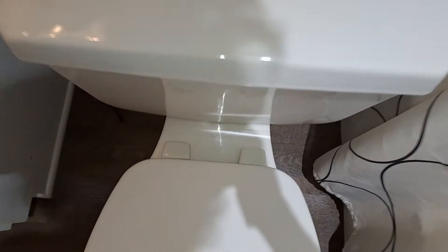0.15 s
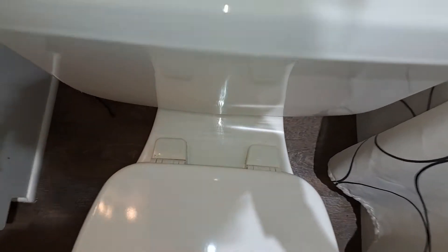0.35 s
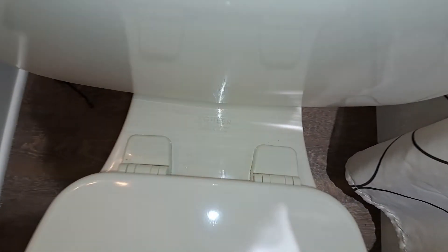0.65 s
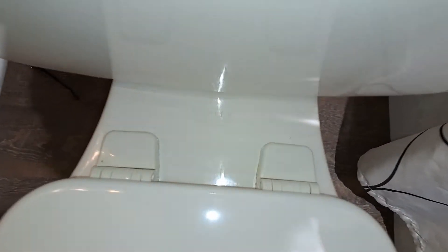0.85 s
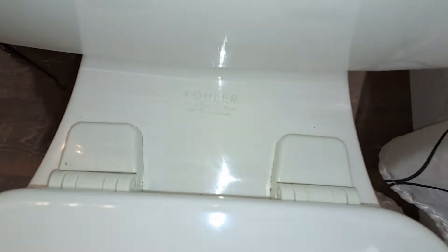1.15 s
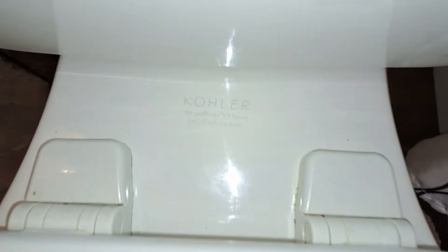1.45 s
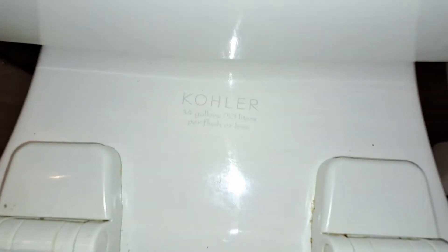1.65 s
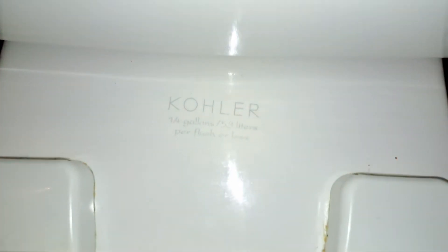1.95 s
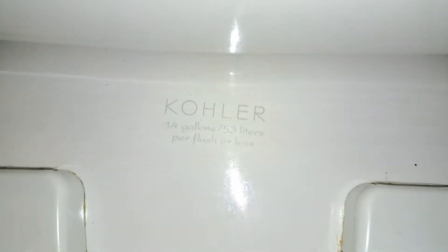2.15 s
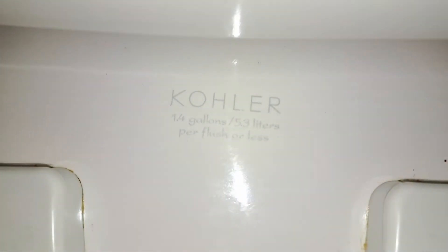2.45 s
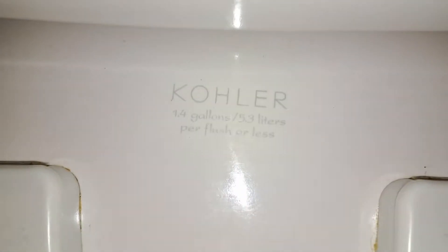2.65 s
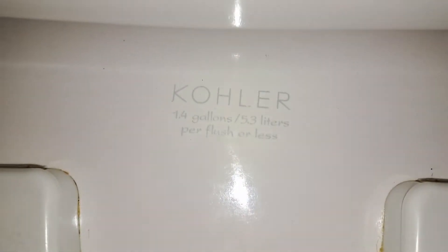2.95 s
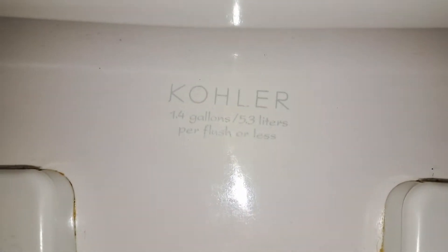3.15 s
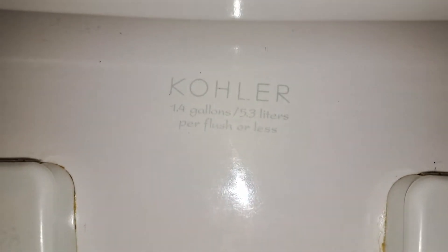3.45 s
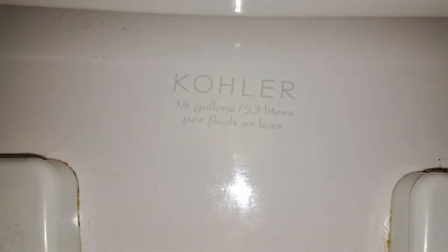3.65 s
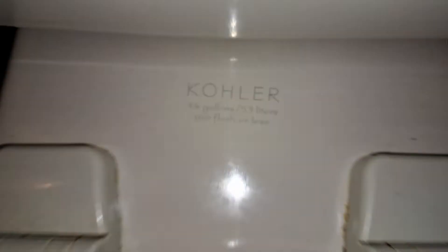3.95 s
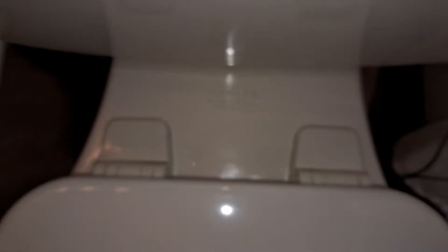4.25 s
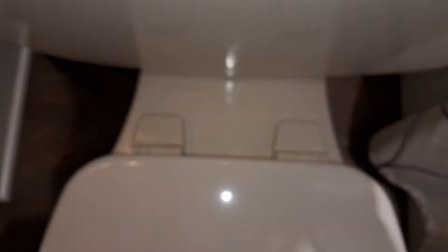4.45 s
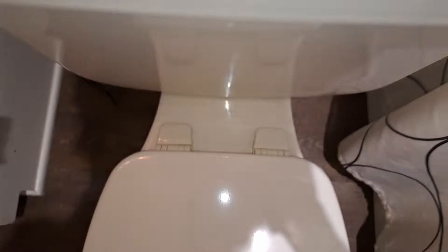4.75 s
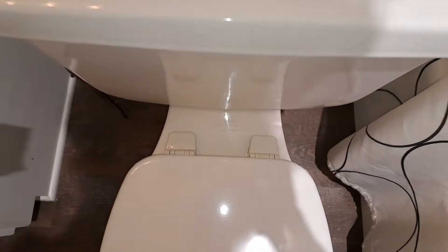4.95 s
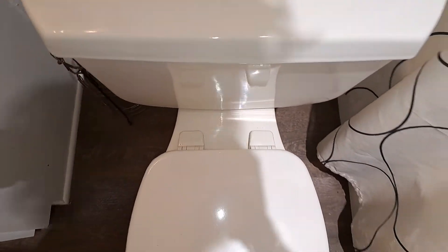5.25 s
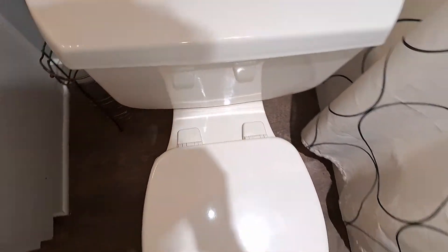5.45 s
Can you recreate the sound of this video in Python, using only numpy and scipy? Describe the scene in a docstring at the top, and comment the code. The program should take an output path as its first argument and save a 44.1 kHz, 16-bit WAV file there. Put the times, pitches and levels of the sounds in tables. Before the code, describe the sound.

Quiet bathroom air with an unsteady low hum is broken early by a sharp, hollow plastic lid slap, by far the loudest event, fading within about half a second. Afterwards something rubs faintly in uneven strokes, a small cluster of taps sounds, more rubbing follows, and a low bump with a rough scrape ends the action. The microphones are close and handheld in character.

```python
"""A low, wavering rumble and soft hiss fill a small tiled bathroom; a plastic toilet lid then clacks onto its seat.
Later something rubs softly in long strokes, taps, and ends in a dull, scuffed knock.
The lid, taps and knocks are decaying modes; the crack, rubbing, scuff and air are coloured noise; the rumble is
wavering sines plus resonated noise. Two unlike microphone ports, close together, hear the treble differently."""
import sys
import numpy as np
from scipy import signal
from scipy.fft import rfft, irfft, next_fast_len
from scipy.io import wavfile

SR = 44100
rng = np.random.default_rng(int(sys.argv[2]) if len(sys.argv) > 2 else 0)


def transcribe(u):
    """Save the signal u as a 16-bit wav file named by the first command-line argument.

    u: samples, shape (n,) or (channels, n), limited to [-1, 1]; the rate is SR.
    q: integer samples, one column per channel.
    """
    v = np.clip(np.atleast_2d(u).T, -1, 1)
    q = np.round(v * 32767).astype(np.int16)
    wavfile.write(sys.argv[1], SR, q)


N = 247842

# room air: [t/s, level/dB, top treble/dB]
AIR_LEVELS = [(0, -54.5, -5.5), (.9, -55, 0), (1.02, -57.5, -9), (1.15, -56.5, -1), (1.3, -53.5, -10),
              (1.8, -55.5, -10.5), (3.3, -55, -9), (5.05, -50.5, -14), (5.25, -54, -5.5), (5.62, -53, -7.5)]
# air spectrum, relative: [f/Hz, density/dB per Hz]
AIR_COLOUR = [(20, -47.5), (48, -17), (95, -5), (160, -14), (400, -41), (600, -28.5), (830, -34),
              (1150, -25), (1500, -28.5), (2000, -24.5), (3200, -28), (4300, -43), (5800, -49.5),
              (7500, -40.5), (9500, -45.5), (12300, -30.5), (15700, -51)]
# faint narrow whines: [f/Hz, width/Hz, level/dB]
WHINES = [(1349, 29, -66), (1753, 73, -71), (1940, 27, -83.5)]

# standing waves: [t/s, lowest/dB, second/dB, higher/dB]
RUMBLE_LEVELS = [(0, -57, -49, -57), (.3, -59.5, -61, -59), (1.3, -52.5, -53.5, -53.5),
                 (1.85, -60.5, -58, -54), (2.03, -60, -48.5, -55.5), (2.2, -58, -59.5, -54.5),
                 (2.4, -56.5, -54, -53), (3.1, -54.5, -52, -51), (3.85, -50, -48.5, -50.5),
                 (3.95, -49.5, -54.5, -50), (4.7, -56, -56.5, -55.5), (5.15, -56, -59, -56),
                 (5.62, -58, -52, -57.5)]
# higher standing waves: [f/Hz, first-stage width/Hz, relative level/dB]
STANDING_WAVES = [(189.8, 35, -1.5), (220.6, 25.6, -1), (252.2, 14.5, 3), (273.1, 15, -1), (319.4, 28, 2.5),
                  (349.3, 37, -8.5), (444, 47, -4), (483, 74, -4.5)]
# swells added to the lowest standing wave: [t/s, peak/dB]
SWELLS = [(.04, -50), (.4, -45), (.7, -47), (.9, -54), (1.1, -54.5), (1.5, -43.5), (1.61, -51), (1.73, -50),
          (2.11, -48), (2.55, -48), (2.74, -49), (2.92, -46.5), (3.09, -45), (3.3, -48), (3.67, -45.5),
          (3.86, -38), (4.12, -46), (4.24, -52), (4.4, -50), (4.6, -49), (4.72, -56), (4.94, -46),
          (5.3, -55)]
LOWEST_HZ, SECOND_HZ = 69.4, 122.5
SUB_HUM_HZ, SUB_HUM_DB = 28.1, -58.5
SWELL_SIGMA_S = 0.029
FADE_DB, SECOND_FADE_DB, FADE_RATE_HZ = 2, 3.0, 5.4   # random fading of the two hums
WAKE_DB, WAKE_RISE_S, WAKE_T60_S = -22, 0.039, .45   # the clack wakes the higher standing waves

# rubbing strokes: [t/s, level/dB, top treble/dB]
RUB_STROKES = [(1.84, -75, 8.5), (2.02, -56, -6), (2.15, -58, -3.5), (2.36, -47, -0.5), (2.57, -43.5, 0),
               (2.71, -52, 6), (2.78, -46.5, 6.5), (3.21, -47.5, -1), (3.32, -52.5, -8), (3.41, -54.5, 0.5),
               (3.56, -45.5, 2), (3.95, -46.5, -1), (3.99, -44, 3), (4.31, -45.5, -1.5), (4.64, -45.5, 1.5),
               (4.785, -55.5, 1), (5.0, -66, 3)]
# friction spectrum, relative: [f/Hz, density/dB per Hz]
RUB_COLOUR = [(150, -54), (270, -13), (500, -11), (900, -12.5), (1400, -9), (2100, -6), (2800, -4),
              (3600, -9), (4600, -15.5), (5700, -21.5), (7500, -17.5), (9000, -26), (12000, -14.5),
              (15700, -29.5)]
LEAN_DB, LEAN_RATE_HZ, LEAN_SPLIT_HZ = 1.5, 2.5, 2630   # rubbing leans brighter or duller at random

# scuffed knock: [t/s, thump/dB, scuff/dB, boom/dB]
SCUFF_LEVELS = [(4.794, -60, -61, -56), (4.806, -33, -41, -37), (4.83, -35, -38.5, -50),
                (4.858, -41, -37, -31), (4.968, -46, -43.5, -43), (4.995, -64, -49, -51),
                (5.06, -63, -54, -45.5), (5.15, -62, -67, -63)]
# thump spectrum, relative: [f/Hz, density/dB per Hz]
THUMP_COLOUR = [(15, -10), (30, 10), (55, -5.5), (90, 6), (200, -42.5)]
# scuff spectrum, relative: [f/Hz, density/dB per Hz]
SCUFF_COLOUR = [(180, -31), (300, -9), (354, 3), (404, -8.5), (446, -8.5), (697, -13.5), (770, -14.5),
                (1400, -10.5), (1540, -15), (2710, -10), (5600, -33.5), (12200, -35), (15600, -51)]
BOOM_HZ, BOOM_WIDTH_HZ = 122.8, 26.4

# small knocks within the scuff: [t/s, level/dB, tilt/dB per octave]
KNOCKS = [(4.807, -31.5, -4), (4.847, -41.5, -2), (4.866, -41, 1.5), (4.915, -40, 2), (4.93, -47, 5.5)]
# modes rung by each knock: [f/Hz, level/dB, t60/s]
KNOCK_MODES = [(181.5, 2, 0.26), (255, -12, .1), (316, -4, 0.11), (353, -3.5, 0.13), (441.2, -6, 0.31),
               (800, -19, .05)]
KNOCK_SPREAD_DB, KNOCK_RISE_S = 4, 0.0023

# dull taps and bumps: [t/s, level/dB, f/Hz]
TAPS = [(3.726, -38.5, 248), (3.770, -28.5, 352), (3.788, -35, 383), (3.797, -36.5, 460), (3.986, -41, 325),
        (3.771, -36, 2500), (3.851, -33, 2600), (4.825, -25, 49.7), (5.014, -37, 55)]
TAP_CYCLES = 13   # swings to -60 dB

# soft returns of a lid ring: [t/s, level/dB]
RETURNS = [(1.603, -37), (1.695, -44)]
RETURN_HZ, RETURN_RISE_S, RETURN_T60_S = 580, 0.00605, 0.2

# clack treble, relative: [f/Hz, density/dB per Hz]
CRACK_COLOUR = [(500, -38), (800, -19.5), (1100, -13.5), (1500, -16), (2100, -13.5), (2800, -21.5),
                (3800, -29), (5500, -50), (7500, -53.5), (10000, -59.5), (12500, -53.5), (15500, -73)]
# clack tail in the room: [f/Hz, t60/s]
CRACK_T60 = [(600, 0.51), (1500, 0.34), (3000, 0.31), (4500, 0.3), (7000, 0.34), (15000, 0.19)]
CRACK_DB, SNAP_T60_S, SNAP_DB, CRACK_RISE_S = -19, 0.026, 17, 0.0027

# contacts of the lid: [t/s, strength/dB]
LID_CONTACTS = [(1.42266, -5.3), (1.42842, 0), (1.42946, -.7), (1.4403, -14.9)]
# lid, seat and room air ringing together: [f/Hz, level before LID_DB/dB, t60/s, sense of swing]
LID_MODES = [(117.7, -28.6, .37, 1), (123.7, -19.4, .39, -1), (143.1, -28.6, .145, 1),
             (187.8, -14.1, .274, -1), (192.3, -11.6, .27, 1), (199, -12.8, .19, -1),
             (225.1, -24.7, .347, -1), (240, -13.9, .185, 1), (250.6, -23.6, .418, -1),
             (274.9, -35, .3, -1), (315.4, -21.9, .278, -1), (329.2, -24.6, .397, 1), (345.2, -17.4, .3, 1),
             (408.4, -12.1, .245, 1), (452.2, -16.8, .103, 1), (471.9, -13.5, .187, 1),
             (546.5, -10.2, .205, 1), (550.4, -22.5, .49, 1), (562.2, -20.1, .297, -1),
             (577.7, -27.2, .41, 1), (604, -14.7, .292, -1), (662.9, -19.5, .05, -1),
             (787.9, -22.7, .064, -1)]
# porcelain modes: [f/Hz]
BOWL_HZ = [281, 326.5, 405, 445.5, 503, 556, 673, 799, 834, 922, 1034, 1109, 1180, 1268, 1434, 1507, 1758,
           1850, 1943, 2040, 2395]
# the same porcelain modes: [level/dB, t60/s]
BOWL_RINGING = [(-50, 0.34), (-42, 0.49), (-43, 0.27), (-23.5, 0.32), (-26, 0.31), (-37, 0.55), (-35, 0.43),
                (-37.5, 0.34), (-37.5, 0.44), (-26.5, 0.38), (-22, 0.18), (-44.5, 0.32), (-34, 0.25),
                (-28, 0.27), (-28.5, .12), (-34.5, 0.19), (-33.5, 0.18), (-28.5, .2), (-40, 0.22),
                (-44, 0.18), (-32.5, 0.14)]
# paths from the lid to the ports: [f/Hz, left lead/rad, left minus right/dB]
LID_PATH = [(97.3, 0.18, 0), (300, 0.13, 0), (550, 0.61, 4), (900, 1.8, -3.5), (1290, 2, 6),
            (2000, 2.7, -5.5), (3020, 19, -6.5)]
LID_DB, CONTACT_HZ = 1.2, 4000   # rubber bumpers round the clicks off

# likeness of diffuse sound at the ports: [f/Hz, left-right correlation]
LIKENESS = [(40, 0.48), (150, 0.78), (300, 0.89), (640, 0.57), (1000, -0.18), (1400, -0.4), (2400, 0.038),
            (15000, -0.0067)]
# port colour: [f/Hz, left minus right/dB]
PORT_DIFFERENCE = [(60, -3.5), (130, 1), (400, -2), (750, -0.5), (1200, -7.5), (1800, -8), (2700, -16.5),
                   (3600, -11.5), (4500, -4.5), (5800, 8), (7300, -3), (9000, 1.5), (10500, -2.5),
                   (12300, -7), (15000, 1.5)]
RIPPLE_DB, RIPPLE_HZ = 2.0, 29.76   # the bare room favours some pitches: ripple depth and spacing
CUTOFF_HZ = 15740


def from_db(db):
    """Decibels to gain."""
    return 10 ** (np.asarray(db) / 20)


def rms_one(x):
    """Scale to unit rms."""
    return x / np.sqrt(np.mean(x ** 2) + 1e-20)


def in_time(rows):
    """Table columns at every sample, plus a gate open while the table lasts."""
    s, *columns = np.transpose(rows)
    t = np.arange(N) / SR
    gate = np.clip(np.minimum(t - s[0], s[-1] - t) / 0.0048, 0, 1)
    return [np.interp(t, s, c) for c in columns] + [gate]


def at_hz(points, hz):
    """Read a spectrum table on a log-frequency axis."""
    table_hz, value = np.transpose(points)
    return np.interp(np.log(hz), np.log(table_hz), value)


def bins(length):
    """Transform frequencies in Hz, at least 1."""
    return np.maximum(np.arange(length // 2 + 1) * SR / length, 1)


def diffuse(spectrum, length=N):
    """Coloured noise from all round: alike at both ports in the bass, unrelated in the top treble."""
    size = next_fast_len(length)
    hz = bins(size)
    mid, side = rfft(rng.standard_normal((2, size)))
    alike = np.clip(at_hz(LIKENESS, hz), -1, 1)
    pair = np.sqrt(1 + alike) * mid + np.sqrt(1 - alike) * side * [[1], [-1]]
    ripple = np.interp(hz / RIPPLE_HZ, np.arange(2000), rng.standard_normal(2000))
    gain = from_db(at_hz(spectrum, hz) + RIPPLE_DB * ripple)
    return rms_one(irfft(pair * gain, size)[:, :length])


def resonance(x, hz, width_hz):
    """Two-pole resonance, peak gain about 1."""
    r = np.exp(-np.pi * width_hz / SR)
    zeros = np.array([1, 0, -1]) * (1 - r * r) / 2
    poles = [1, -2 * r * np.cos(2 * np.pi * hz / SR), r * r]
    return signal.lfilter(zeros, poles, x)


def brighten(x, top_db, split_hz):
    """Give the treble above the split its own level curve."""
    high_pass = signal.butter(2, split_hz, "high", fs=SR, output="sos")
    top = signal.sosfiltfilt(high_pass, x)
    return x + top * (from_db(top_db) - 1)


def drift(rate_hz):
    """Low-passed random wander of unit rms."""
    r = np.exp(-2 * np.pi * rate_hz / SR)
    wander = signal.lfilter([1], [1, -2 * r, r * r], rng.standard_normal(N + SR))
    return rms_one(wander[SR:])   # drop the filter's start-up


def ring(pushes, modes):
    """Damped modes driven by the same pushes; phase and level at each port depend on frequency."""
    out, sides = np.zeros((2, N)), np.array([[.5], [-.5]])
    path = np.array(LID_PATH)
    for hz, level_db, t60_s, sense in modes:
        r, w = from_db(-60 / (t60_s * SR)), 2 * np.pi * hz / SR
        swing = signal.lfilter([sense * from_db(level_db)], [1, -r * np.exp(1j * w)], pushes)
        lead_rad = at_hz(path[:, [0, 1]], hz)
        pan_db = at_hz(path[:, [0, 2]], hz)
        out += np.imag(swing * np.exp(1j * lead_rad * sides)) * from_db(pan_db * sides)
    return out


def room_air():
    """Broadband hiss of slowly changing level, with faint narrow noise bands as whines."""
    level_db, top_db, _ = in_time(AIR_LEVELS)
    noise = rng.standard_normal((2, N))
    whines = np.zeros((2, N))
    for hz, width_hz, db in WHINES:
        flutter = from_db(2.5 * drift(7.7))
        whines += from_db(db) * rms_one(resonance(noise, hz, width_hz)) * flutter
    hiss = brighten(diffuse(AIR_COLOUR), top_db, 6700)
    return from_db(level_db) * hiss + whines


def hum(hz, level_db, fade_db, extra_gain):
    """A standing wave as a sine, its pitch wavering within the resonance and its level fading at random."""
    phase = 2 * np.pi * np.cumsum(hz + 3.42 * drift(6.46)) / SR
    gain = from_db(level_db + fade_db * drift(FADE_RATE_HZ)) + extra_gain
    return np.sqrt(2) * gain * from_db(2.0 * drift(35)) * np.sin(phase)


def rumble():
    """Distant low noise keeps the room's standing waves alive; the clack also wakes the higher ones."""
    lowest_db, second_db, higher_db, _ = in_time(RUMBLE_LEVELS)
    t = np.arange(N) / SR
    sub_phase = 2 * np.pi * SUB_HUM_HZ * t + 0.72 * drift(2.5)
    sub_hum = np.sqrt(2) * from_db(SUB_HUM_DB) * np.sin(sub_phase)
    swells = sum(from_db(db) * np.exp(-.5 * ((t - s) / SWELL_SIGMA_S) ** 2) for s, db in SWELLS)
    lowest = hum(LOWEST_HZ, lowest_db, FADE_DB, swells)
    second = hum(SECOND_HZ, second_db, SECOND_FADE_DB, 0)

    noise = diffuse([(20, 0.01), (20000, 0)])   # practically flat
    higher = np.zeros((2, N))
    for hz, width_hz, db in STANDING_WAVES:
        narrow = resonance(resonance(noise, hz, width_hz), hz, 2 * width_hz)
        higher += from_db(db) * rms_one(narrow)
    since_s = np.maximum(t - LID_CONTACTS[0][0], 0)
    wake_rise = np.minimum(since_s / WAKE_RISE_S, 1) ** 2
    woken = wake_rise * from_db(WAKE_DB - 60 * since_s / WAKE_T60_S)
    higher_gain = from_db(higher_db + 1.2 * drift(3.2)) + woken
    return sub_hum + lowest + second + higher_gain * rms_one(higher)


def rubbing():
    """Fine dense friction: a smooth hiss that follows the strokes."""
    level_db, top_db, gate = in_time(RUB_STROKES)
    lean_db = LEAN_DB * drift(LEAN_RATE_HZ)
    leaning = brighten(diffuse(RUB_COLOUR), lean_db, LEAN_SPLIT_HZ)
    hiss = from_db(-lean_db / 2) * leaning
    return gate * from_db(level_db + 0.42 * drift(9)) * brighten(hiss, top_db, 3500)


def scuffed_knock():
    """A dull noise thump wakes a standing wave, with a rough slide on top."""
    thump_db, scuff_db, boom_db, gate = in_time(SCUFF_LEVELS)
    thump = from_db(thump_db) * diffuse(THUMP_COLOUR)
    boom_phase = 2 * np.pi * np.cumsum(BOOM_HZ + BOOM_WIDTH_HZ / 4 * drift(12)) / SR
    boom = np.sqrt(2) * from_db(boom_db) * np.sin(boom_phase)
    scuff = from_db(scuff_db + 0.58 * drift(40)) * diffuse(SCUFF_COLOUR)
    return gate * (thump + boom + scuff)


def knocks():
    """Each knock rings the same modes at random strengths; a falling tilt makes it dull."""
    out, t = np.zeros(N), np.arange(SR // 4) / SR
    hz, mode_db, t60_s = np.transpose(KNOCK_MODES)[:, :, None]
    chance = rng.standard_normal((len(KNOCKS), len(hz), 1))
    for (s, level_db, tilt_db), luck in zip(KNOCKS, chance):
        tilted_db = tilt_db * np.log2(hz / hz[0])
        db = level_db + mode_db + tilted_db + KNOCK_SPREAD_DB * luck
        swing = np.sum(from_db(db - 60 * t / t60_s) * np.sin(2 * np.pi * hz * t), axis=0)
        out[round(s * SR):][:len(t)] -= np.minimum(t / KNOCK_RISE_S, 1) * swing
    return out


def taps():
    """Each tap is one quickly damped sine, starting inward."""
    out, t = np.zeros(N), np.arange(SR // 4) / SR
    for s, level_db, hz in TAPS:
        at = round(s * SR)
        decay = from_db(level_db - 60 * t * hz / TAP_CYCLES)
        out[at:at + len(t)] -= decay * np.sin(2 * np.pi * hz * t)
    return out


def returns():
    """A ring of the lid comes back softly as damped sines, each with a short rise."""
    s, level_db = np.transpose(RETURNS)[:, :, None]
    since_s = np.maximum(np.arange(N) / SR - s, 0)
    rise = np.minimum(since_s / RETURN_RISE_S, 1)
    shape = rise * from_db(level_db - 60 * since_s / RETURN_T60_S)
    return -np.sum(shape * np.sin(2 * np.pi * RETURN_HZ * since_s), axis=0)


def crack():
    """A short treble snap plus a grainy clatter whose decay time depends on the band."""
    length, at = SR // 2, round(LID_CONTACTS[0][0] * SR)
    t, out = np.arange(length) / SR, np.zeros((2, N))
    noise = diffuse(CRACK_COLOUR, length)
    grain = from_db(0.98 * drift(90)[:length])
    snap = from_db(SNAP_DB - 60 * t / SNAP_T60_S)
    rise = np.minimum(t / CRACK_RISE_S, 1) ** 2
    edges_hz = np.geomspace(700, CUTOFF_HZ, 11)
    for low_hz, high_hz in zip(edges_hz, edges_hz[1:]):
        band_pass = signal.butter(2, [low_hz, high_hz], "band", fs=SR, output="sos")
        band = signal.sosfilt(band_pass, noise)
        t60_s = at_hz(CRACK_T60, np.sqrt(low_hz * high_hz))
        tail = grain * from_db(-60 * t / t60_s)
        out[:, at:at + length] += band * (tail + snap) * rise
    return from_db(CRACK_DB) * out


def lid():
    """Bumpers land in turn; the hardest landing also rings the porcelain, neighbours in opposite sense."""
    pushes, hardest = np.full(N, 1e-18), np.full(N, 1e-18)   # tiny floor avoids denormals
    for s, level_db in LID_CONTACTS:
        pushes[round(s * SR)] += from_db(level_db)
    hardest[round(LID_CONTACTS[1][0] * SR)] = 1
    bowl_modes = []
    for k, (hz, (db, t60_s)) in enumerate(zip(BOWL_HZ, BOWL_RINGING)):
        bowl_modes.append((hz, db, t60_s, (-1) ** k))
    rung = from_db(LID_DB) * ring(pushes, LID_MODES) + ring(hardest, bowl_modes)
    return signal.sosfilt(signal.butter(2, CONTACT_HZ, fs=SR, output="sos"), rung)


def scene():
    """All sources at the two ports."""
    background = room_air() + rumble()
    later = rubbing() + scuffed_knock() + knocks() + taps()
    clack = returns() + crack() + lid()
    return background + later + clack


def record(dry):
    """Each port has its own colour; the top is cut."""
    size = next_fast_len(N + 4096)
    ratio = from_db(at_hz(PORT_DIFFERENCE, bins(size)))
    right = np.sqrt(2 / (1 + ratio ** 2))   # squared gains of the pair sum to 2
    heard = irfft(rfft(dry, size) * [ratio * right, right], size)[:, :N]
    low_pass = signal.ellip(12, .5, 60, CUTOFF_HZ, fs=SR, output="sos")
    return signal.sosfilt(low_pass, heard)


dry = scene()
out = record(dry)
transcribe(out)
```